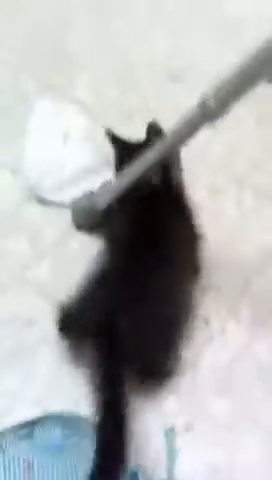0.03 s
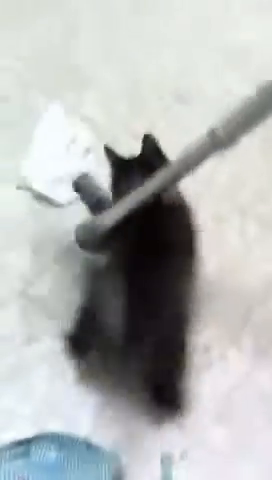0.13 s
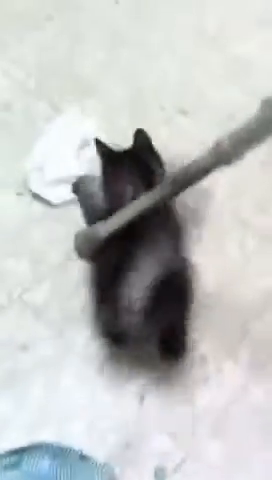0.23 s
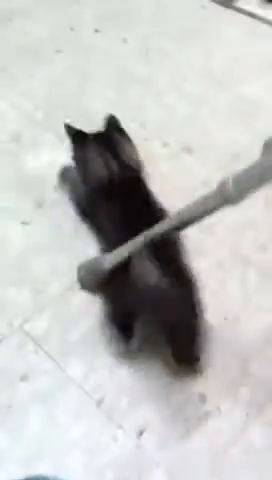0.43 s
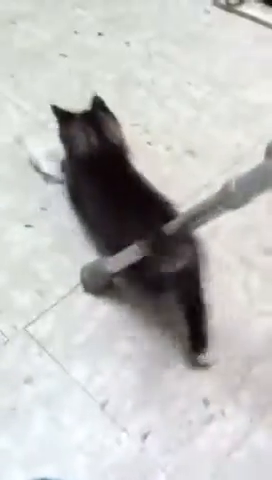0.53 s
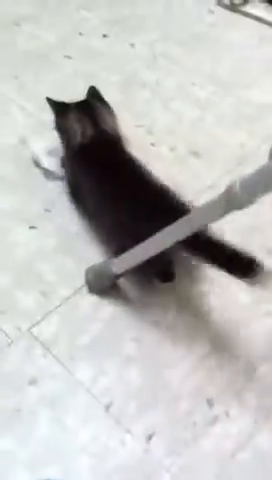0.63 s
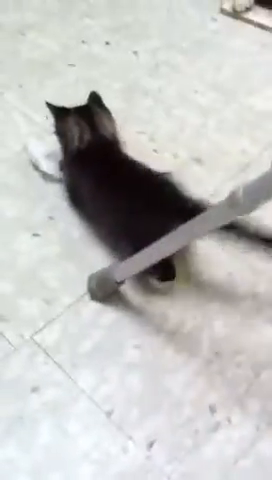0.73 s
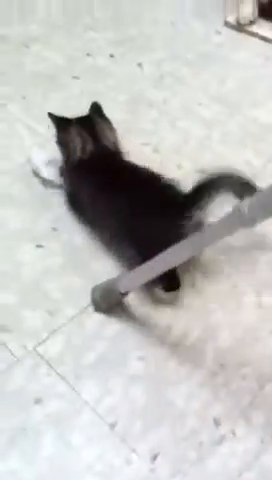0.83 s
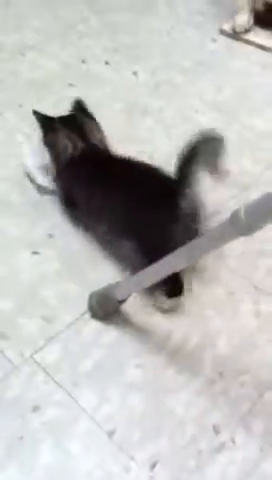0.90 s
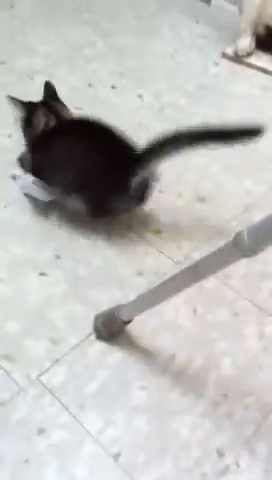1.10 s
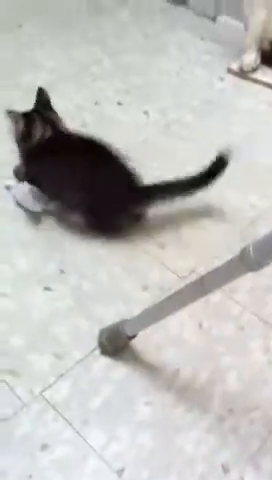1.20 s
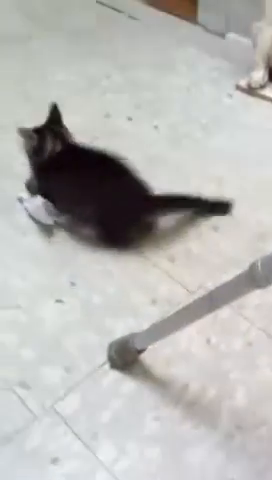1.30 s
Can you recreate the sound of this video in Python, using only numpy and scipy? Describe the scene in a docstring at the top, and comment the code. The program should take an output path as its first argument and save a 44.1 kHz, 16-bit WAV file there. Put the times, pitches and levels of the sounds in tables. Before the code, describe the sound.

A kitten pounces on crumpled paper, with soft paw thumps and faint crackling.

```python
"""A kitten pounces on crumpled paper on a hard floor in a small, bare room.
One dull knock and a run of soft paw thumps set the room ringing; pads scuff, one squeaks, claws tick.
The paper crackles in short strokes as its creases buckle, and slides and swishes over the floor.
A faint hiss and rumble lie underneath."""
import sys
import numpy as np
from scipy import signal
from scipy.fft import rfft, irfft
from scipy.io import wavfile

SR = 44100
rng = np.random.default_rng(int(sys.argv[2]) if len(sys.argv) > 2 else 0)


def dump_mix(stems):
    """Bounce the given channels to the path in sys.argv[1] as a 16-bit WAV at rate SR."""
    frames = np.atleast_2d(stems).T  # one column per channel
    limited = np.clip(frames, -1, 1)  # hard clip at full scale
    pcm = np.round(limited * 32767).astype(np.int16)
    wavfile.write(sys.argv[1], SR, pcm)


N = 59535
T = np.arange(N) / SR


def from_db(db):
    """Decibels to gain."""
    return 10 ** (np.asarray(db) / 20)


def rms_one(x):
    """Scale to rms 1."""
    return x / np.sqrt(np.mean(x ** 2) + 1e-20)


def at_hz(points, hz):
    """Read a table on a log-frequency axis."""
    f, value = np.transpose(points)
    return np.interp(np.log(np.maximum(hz, 1)), np.log(f), value)


def colour(x, spectrum, tilt_db_per_oct=0):
    """Apply a spectrum, tilted about 3 kHz; rms 1."""
    hz = np.maximum(np.fft.rfftfreq(N, 1 / SR), 1)
    gain = from_db(at_hz(spectrum, hz) + tilt_db_per_oct * np.log2(hz / 3000))
    return rms_one(irfft(rfft(x) * gain, N))


def cut(x, hz, kind, order=2):
    """Butterworth filter."""
    return signal.sosfilt(signal.butter(order, hz, kind, fs=SR, output="sos"), x + 1e-18)


def through(x, response, gain_db=0):
    """Convolve with an impulse response."""
    return from_db(gain_db) * signal.fftconvolve(x, response)[:N]


def decay(t60_s):
    """Exponential decay."""
    return np.exp(-np.log(1000) * T / t60_s)


def ringing(modes):
    """Impulse response of damped modes."""
    return sum(from_db(db) * np.cos(2 * np.pi * hz * T) * decay(t60_s) for hz, db, t60_s in modes)


def grains(per_s, spread_db):
    """Random clicks of uneven size."""
    sizes = from_db(spread_db * np.minimum(rng.exponential(1, N), 4))
    return sizes * rng.choice([-1, 1], N) * (rng.random(N) < per_s / SR)


def knock(room):
    """Hard landing: one blunt blow on the floor, band-limited by the contact; its low thud is played with the
    paw thumps."""
    at_s, low_hz, top_hz = .2538, 166, 928
    impulse = np.zeros(N)
    impulse[int(at_s * SR)] = -from_db(-12) * SR / (8 * top_hz)
    blow = cut(cut(impulse, low_hz, "high"), top_hz, "low", order=6)
    return blow + through(blow, room, gain_db=2.5)


def paws(room):
    """Each pad presses the floor in a smooth thud of a cycle or two; one such thud, just after the knock, is
    the knock's own low body."""
    # paw falls: t/s, peak/dB, f/Hz, room send/dB; the row at 0.26 s is the low thud of the knock
    falls = [(.004, -67.5, 164, 5), (0.2229, -41.5, 189, -0.5), (0.2599, -37, 195, -16.5),
             (0.274, -41, 162, 2), (0.338, -44, 162, -4), (.371, -42, 153, -6), (.473, -44, 219, 0),
             (0.64, -54, 154, 3.5), (0.721, -63, 162, -9), (.836, -60, 210, -4.5), (0.986, -63, 206, -1),
             (1.043, -60, 222, -1), (1.166, -57, 205, 0), (1.242, -46, 256, -5.5)]
    half_width_cycles = 0.87
    direct, sent = 0, 0
    for at_s, db, hz, room_db in falls:
        cycles = hz * (T - at_s)
        thud = from_db(db) * np.cos(2 * np.pi * cycles) * np.exp(-(cycles / half_width_cycles) ** 2)
        direct += thud
        sent += from_db(room_db) * thud
    return direct + through(sent, room)


def scuffs(room):
    """Pads drag briefly over the floor: dull puffs of friction."""
    # pad drags: peak t/s, level/dB, half-width/s, centre f/Hz
    drags = [(0.196, -65, 0.012, 470), (0.2202, -44.5, 0.0028, 490), (.462, -56.5, 0.0088, 490),
             (.5425, -54, 0.0051, 504), (0.64, -58.5, 0.0051, 507), (0.982, -70, .020, 646),
             (1.149, -56, 0.0082, 760)]
    band_oct = 1.55
    edge_ratio = 2 ** (band_oct / 2)
    puffs = 0
    for at_s, db, half_width_s, hz in drags:
        friction = rms_one(cut(rng.standard_normal(N), [hz / edge_ratio, hz * edge_ratio], "band"))
        puffs += from_db(db) * friction * np.exp(-((T - at_s) / half_width_s) ** 2)
    return puffs + through(puffs, room)


def squeak(room):
    """Stick-slip of a skidding paw, falling in pitch as it slows."""
    # skid: t/s, f/Hz, level/dB
    skid = [(0.2176, 2895, -63), (0.2197, 2625, -48), (.222, 2240, -49), (0.2248, 1990, -46.5),
            (0.227, 1820, -68)]
    at_s, hz, db = np.transpose(skid)
    wobble_hz = 303 * rms_one(cut(rng.standard_normal(N), 584, "low"))
    pitch_hz = np.interp(T, at_s, hz) + wobble_hz
    envelope = from_db(np.interp(T, at_s, db)) * (T > at_s[0]) * (T < at_s[-1])
    tone = envelope * np.sin(2 * np.pi * np.cumsum(pitch_hz) / SR)
    return tone + through(tone, room, gain_db=2)


def claws(room):
    """Claws strike the hard floor: short, bright ticks."""
    # claw strikes: t/s, level before the high-pass/dB
    strikes = [(1.2043, -47), (1.2447, -39.5)]
    decay_s, low_hz = .0008, 5500
    envelope = sum(from_db(db) * (T >= at_s) * np.exp(-np.abs(T - at_s) / decay_s)
                   for at_s, db in strikes)
    ticks = cut(envelope * rng.choice([-1, 1], N), low_hz, "high")
    return ticks + through(ticks, room, gain_db=-6)


def paper_crackle(room):
    """Each stroke buckles the creases in a burst of tiny snaps that ring in the folds."""
    # strokes: peak t/s, level/dB, attack/s, release/s, tilt/(dB/oct), fold send/dB
    strokes = [(.190, -55.5, 0.015, 0.034, -6, -2), (0.222, -49.5, 0.0056, 0.0079, -2.5, -20),
               (.226, -51, 0.011, 0.075, -5.5, -18), (0.456, -56, .003, 0.036, -1, -17.5),
               (0.474, -55.5, 0.005, 0.041, -5, -4), (0.542, -64, 0.01, 0.058, -3, -18),
               (1.035, -52, .002, 0.0069, 0, -2), (1.0398, -42.5, 0.0022, 0.0038, 1.5, 1),
               (1.060, -56.5, 0.0044, 0.011, 0, -11), (1.117, -59, 0.0088, 0.031, -2.5, -13),
               (1.150, -68, 0.024, 0.029, 3, -13), (1.25, -59, .003, 0.0041, 2.5, -6),
               (1.263, -68, .010, 0.018, 1.5, -11)]
    # snap spectrum: f/Hz, relative level/dB
    spectrum = [(200, -20), (500, -2), (1000, -1.5), (2000, 1.5), (3400, 0.5), (5000, -2), (8000, -8.5),
                (12500, -6.5), (16000, -18)]
    # fold resonances: f/Hz, level/dB, t60/s
    fold_modes = [(1940, -35.5, 0.032), (2220, -40.5, 0.039), (2700, -34.5, 0.022), (3218, -29.5, 0.032),
                  (3427, -31.5, 0.035), (3865, -35, .025), (6180, -32.5, 0.014)]
    folds = ringing(fold_modes)
    crackle = 0
    for at_s, db, attack_s, release_s, tilt_db_per_oct, fold_db in strokes:
        envelope = np.exp(-np.maximum((at_s - T) / attack_s, (T - at_s) / release_s))
        texture = colour(grains(per_s=8000, spread_db=1.5), spectrum, tilt_db_per_oct)
        snaps = from_db(db) * envelope * texture
        crackle += snaps + through(snaps, folds, fold_db)
    return crackle + through(crackle, room, gain_db=-3)


def paper_slide():
    """Fine friction grains as paper and fur slide over the floor."""
    # slide envelope: t/s, level/dB
    levels = [(0, -99), (.13, -82), (.2, -59.5), (.34, -65.5), (.43, -73), (.52, -60.5), (.68, -68.5),
              (.77, -70.5), (.89, -67), (.94, -68), (1.01, -60.5), (1.2, -61), (1.29, -64), (1.35, -69)]
    # friction spectrum: f/Hz, relative level/dB
    spectrum = [(100, 1), (220, 11.5), (500, 0), (1300, 4.5), (2300, -0.5), (3500, 1.5), (7000, -1),
                (12500, -0.5), (16000, -3)]
    envelope = from_db(np.interp(T, *np.transpose(levels)))
    return envelope * colour(grains(per_s=14000, spread_db=3), spectrum)


def paper_swish():
    """The flat of the sheet glides over the floor with a light hiss."""
    # glides: peak t/s, level/dB, half-width/s
    glides = [(0.774, -67.5, 0.12), (0.945, -64, 0.032)]
    # hiss spectrum: f/Hz, relative level/dB
    spectrum = [(1000, -22), (2400, -3.5), (3400, 3.5), (4600, -4.5), (5700, -1), (8000, -10),
                (16000, -5.5)]
    envelope = sum(from_db(db) * np.exp(-((T - at_s) / half_width_s) ** 2)
                   for at_s, db, half_width_s in glides)
    return envelope * colour(rng.standard_normal(N), spectrum)


def room_response():
    """A diffuse tail that dies band by band, plus the low room resonances."""
    # room resonances: f/Hz, level/dB, t60/s
    modes = [(77.3, -46.5, 0.41), (145, -53.5, 0.27), (173.9, -47.5, 0.21), (233.1, -47, 0.26),
             (270.5, -59, .35), (324.6, -58.5, 0.57), (365, -69, 0.51), (415.1, -49.5, 0.25),
             (515.6, -52.5, 0.39), (571, -50, .35), (603.6, -57.5, 0.52), (633, -59.5, 0.23),
             (760, -89, 0.19), (774, -71, 0.21), (948, -66, 0.12), (1010, -46, 0.12)]
    # tail spectrum: f/Hz, gain/dB
    spectrum = [(60, -21), (120, -11.5), (200, 1), (350, 1.5), (600, -1), (1200, -3.5), (4000, -1),
                (15000, 3.5)]
    # tail decay: f/Hz, t60/s
    decay_times = [(150, 0.67), (600, 0.26), (3000, 0.24), (14000, 0.13)]
    first_echo_s = 0.0044
    onset = np.clip(T / first_echo_s - .5, 0, 1)
    edges_hz = np.geomspace(50, 17000, 15)
    tail = 0
    for low_hz, high_hz in zip(edges_hz, edges_hz[1:]):
        centre_hz = np.sqrt(low_hz * high_hz)
        noise = cut(rng.standard_normal(N), [low_hz, high_hz], "band")
        band = rms_one(noise * decay(at_hz(decay_times, centre_hz)) * onset)
        unity_gain = np.sqrt(2 * (high_hz - low_hz) / SR / N)
        tail += band * unity_gain * from_db(at_hz(spectrum, centre_hz))
    return tail + ringing(modes)


def background(level_db):
    """Steady faint hiss and rumble."""
    # noise spectrum: f/Hz, relative level/dB
    spectrum = [(25, 4), (50, 13), (75, 8), (110, -8), (170, 15), (300, 11), (600, 3.5), (1300, -1),
                (4000, -3), (10000, -5), (15500, -6)]
    return from_db(level_db) * colour(rng.standard_normal(N), spectrum)


def scene():
    """Kitten and paper in one room, over the background; mono."""
    room = room_response()
    noise = background(level_db=-68)
    kitten = knock(room) + paws(room) + scuffs(room) + squeak(room) + claws(room)
    paper = paper_crackle(room) + paper_slide() + paper_swish()
    return (kitten + paper + noise)[None]


def record(dry):
    """The microphone drops the deep bass; the top is cut steeply."""
    low_hz, top_hz = 62, 15850
    thin = cut(dry, low_hz, "high", order=4)
    return signal.sosfilt(signal.ellip(12, .1, 70, top_hz, fs=SR, output="sos"), thin)


dry = scene()
out = record(dry)
dump_mix(out)
```